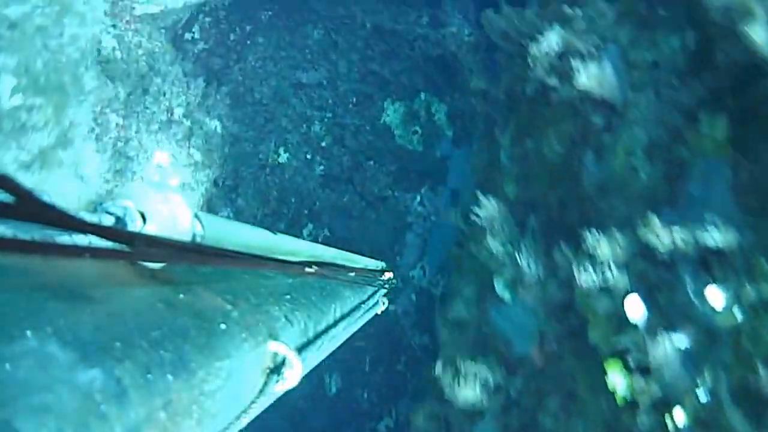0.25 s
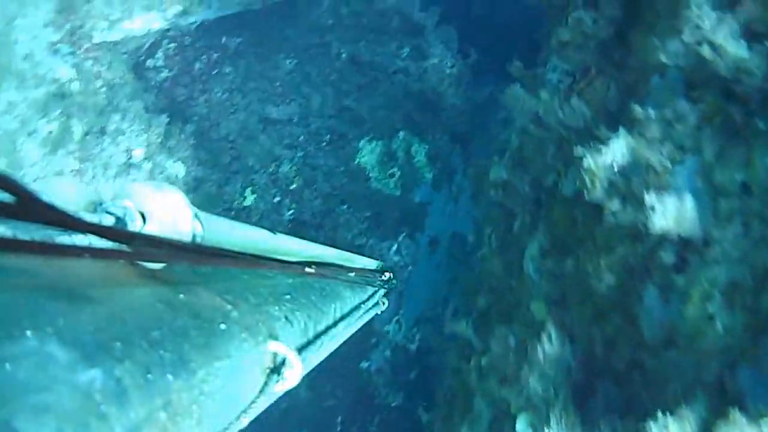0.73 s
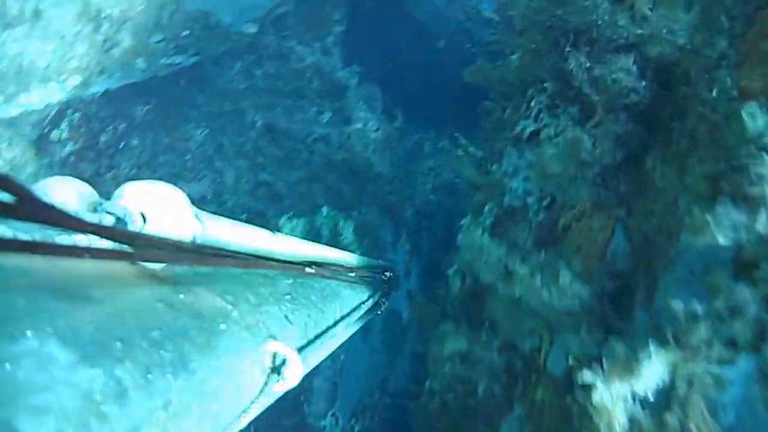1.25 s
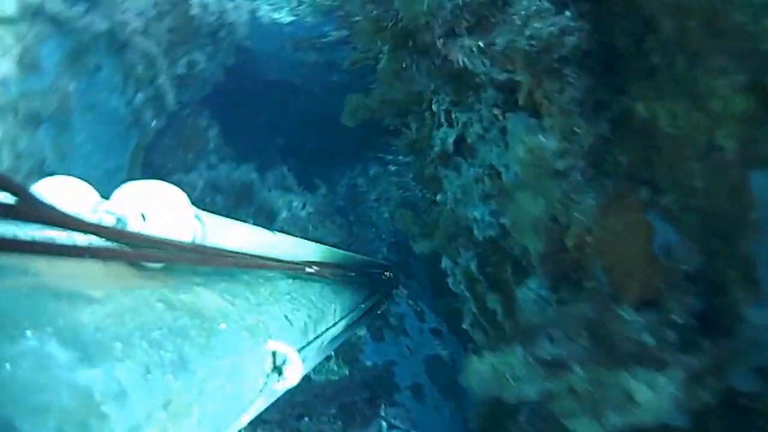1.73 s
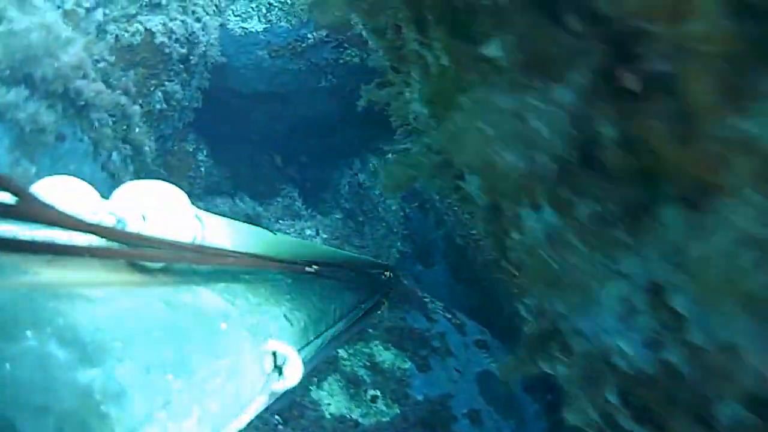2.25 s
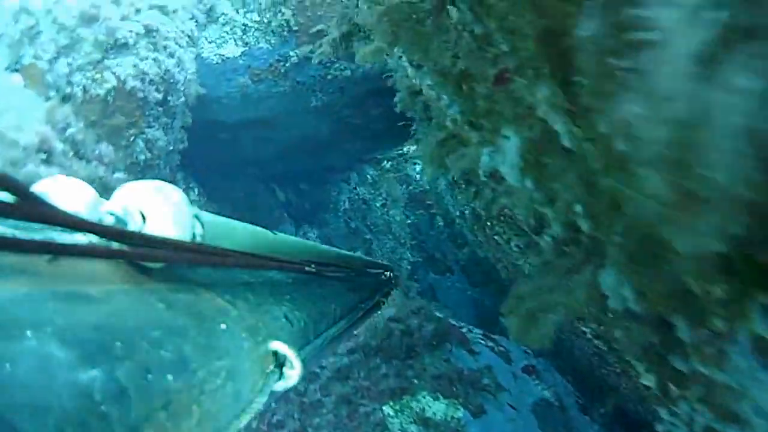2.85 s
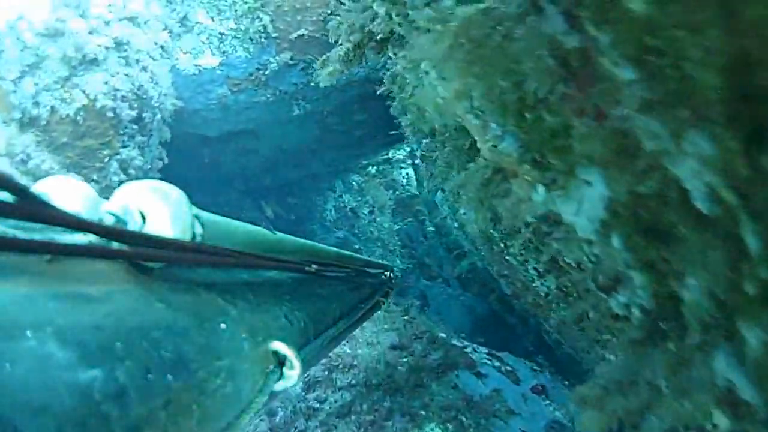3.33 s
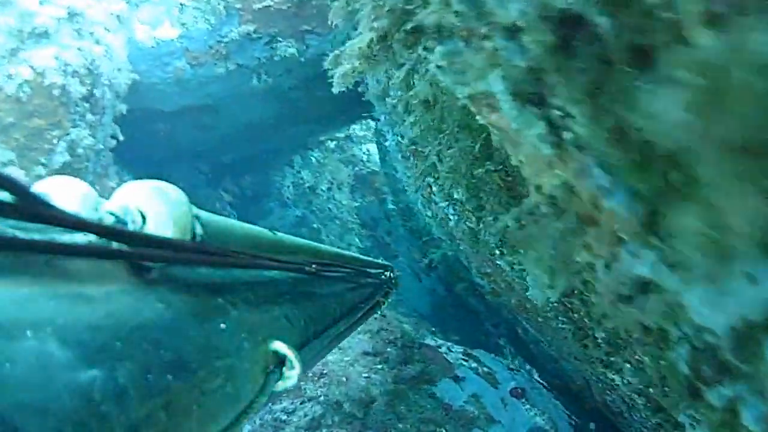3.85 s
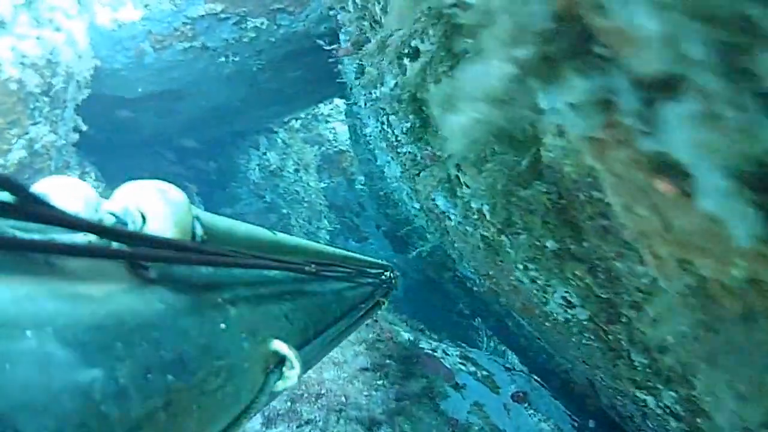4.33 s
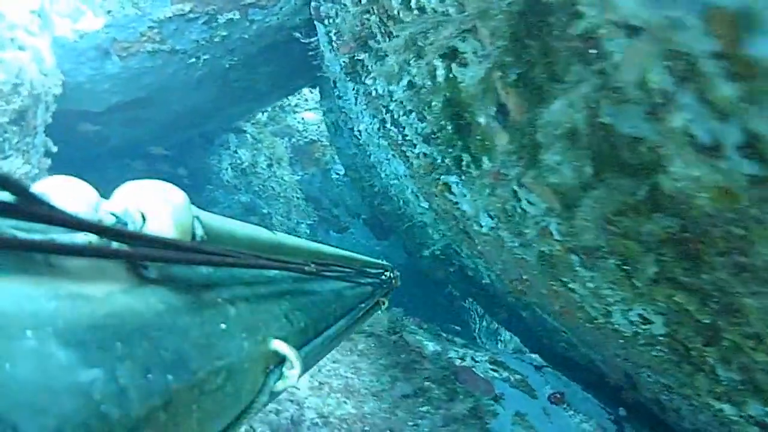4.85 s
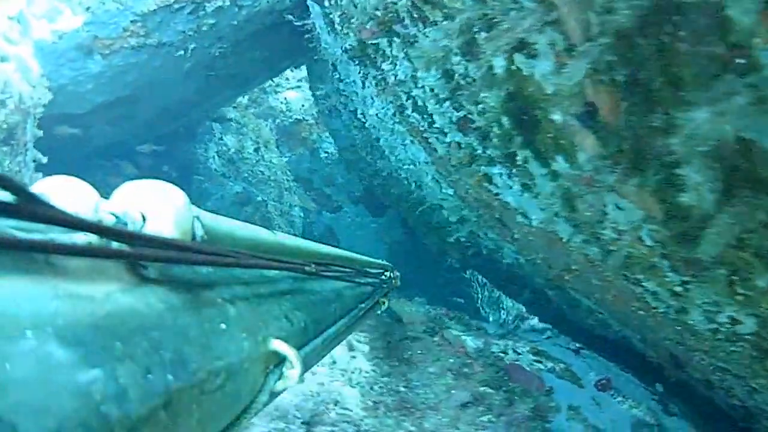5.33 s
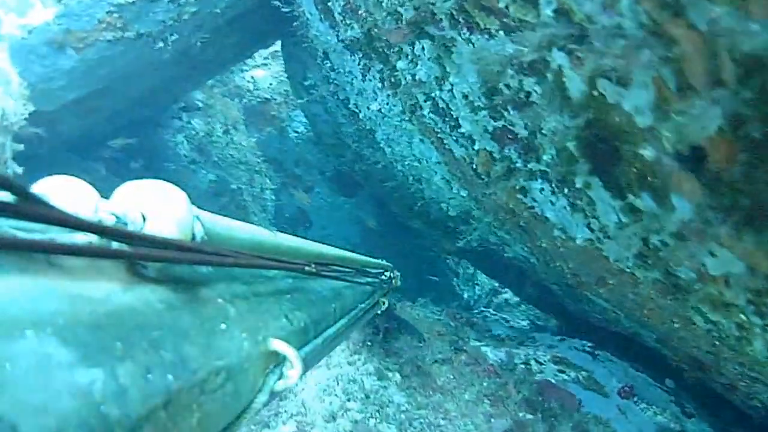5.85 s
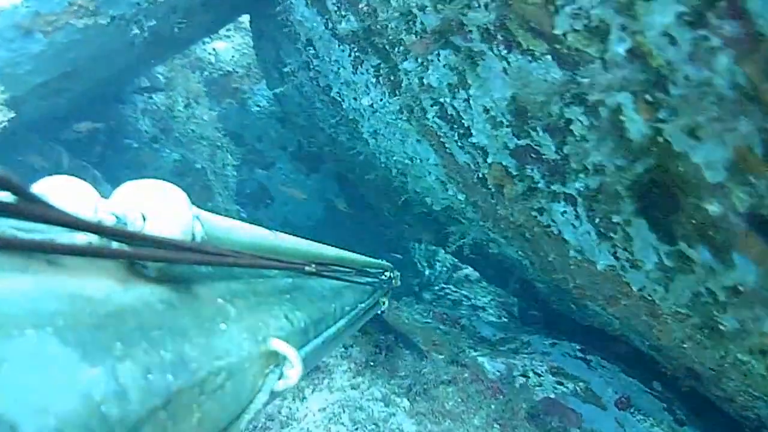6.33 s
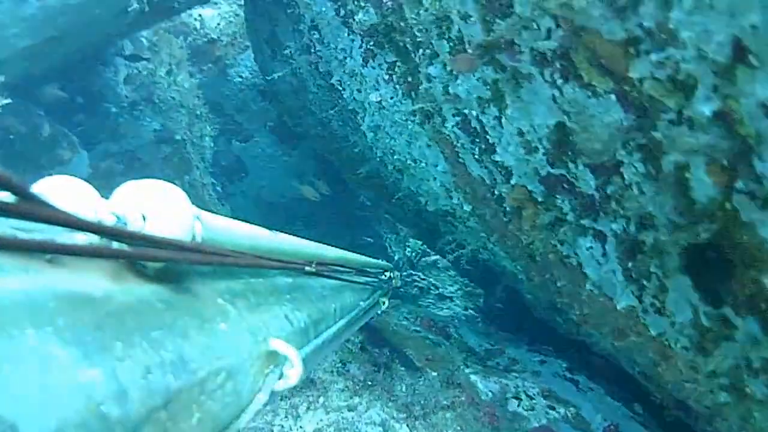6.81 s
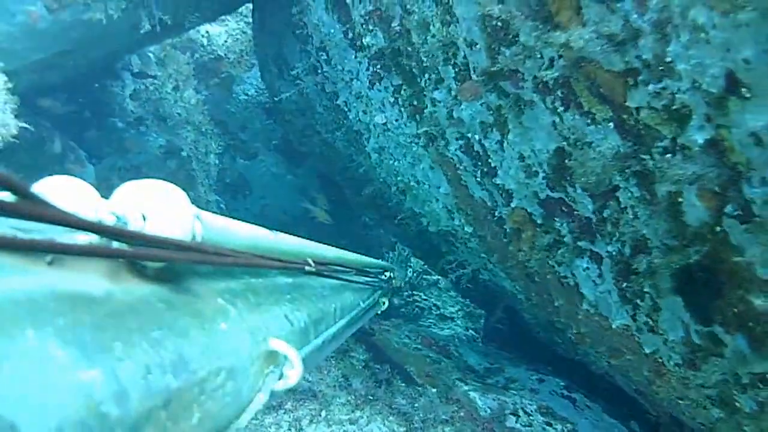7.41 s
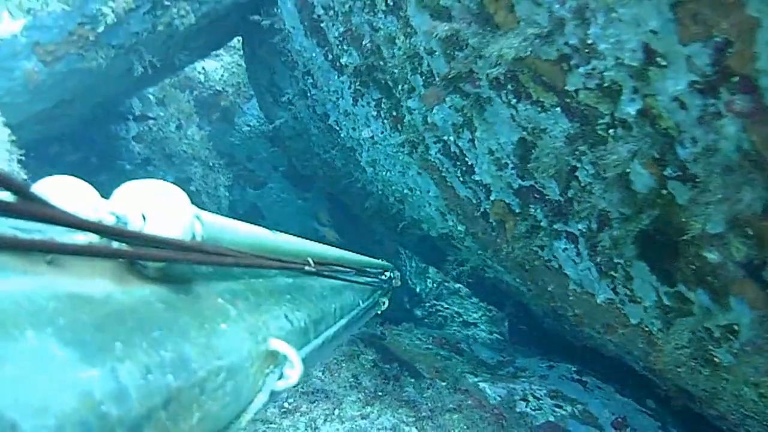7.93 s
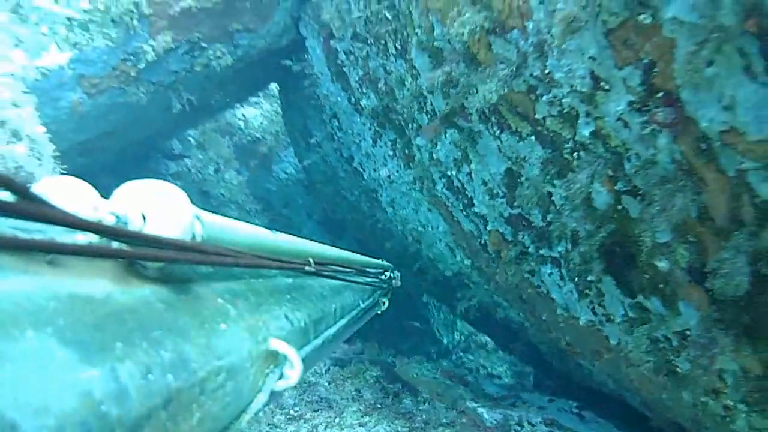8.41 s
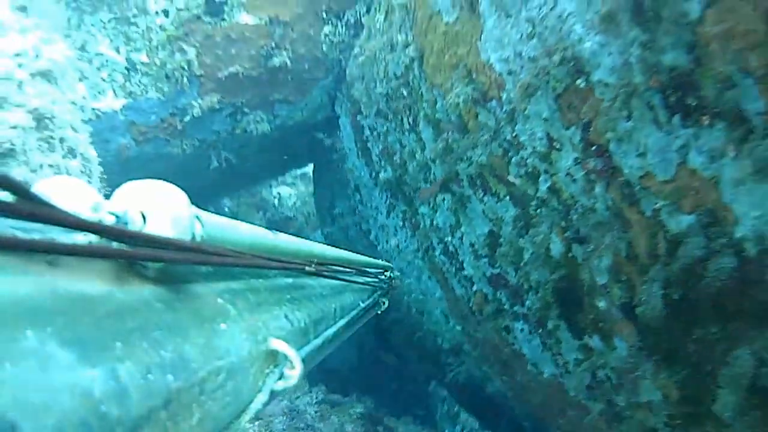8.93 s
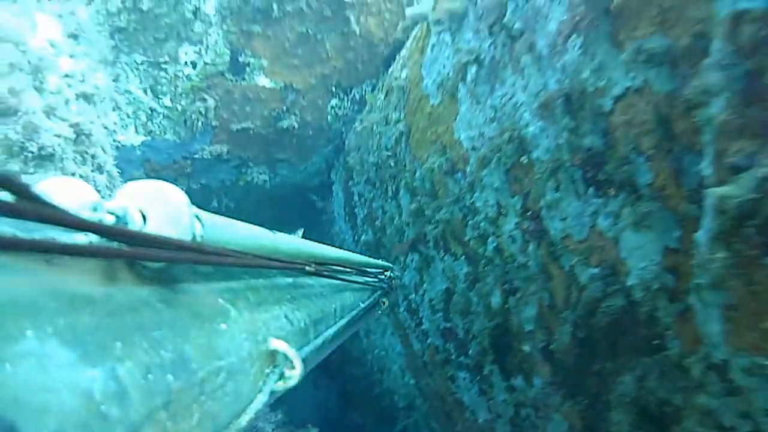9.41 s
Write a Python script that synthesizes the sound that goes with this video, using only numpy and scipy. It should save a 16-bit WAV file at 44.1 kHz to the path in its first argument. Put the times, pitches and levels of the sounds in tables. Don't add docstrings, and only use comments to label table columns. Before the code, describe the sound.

Close, muffled sound from inside a sealed underwater housing fixed to a long barrel. Deep flow rumble shakes the mount while water washes softly past. Early on come hollow knocks, rubbing and bubbly gurgles, with a distorted hard knock around two and a half seconds. Then a second open microphone adds faint hiss, thin whine, dry clicks and strap rustle as the rumble gradually eases and small taps continue.

```python
import sys
import numpy as np
from scipy import signal
from scipy.fft import rfft, irfft, next_fast_len
from scipy.io import wavfile
from scipy.ndimage import uniform_filter1d

SR = 44100
rng = np.random.default_rng(int(sys.argv[2]) if len(sys.argv) > 2 else 0)


def materialize(psi):
    bounded = np.clip(np.atleast_2d(psi).T, -1, 1)
    quanta = np.round(bounded * 32767).astype(np.int16)
    wavfile.write(sys.argv[1], SR, quanta)


def level_to_linear(level):
    exponent = np.asarray(level, float) / 20
    return 10 ** exponent


N = 426447


def rms_one(x):
    return x / np.sqrt(np.mean(x ** 2) + 1e-20)


def in_time(rows):
    s, *columns = np.transpose(rows)
    return [np.interp(np.arange(N) / SR, s, c) for c in columns]


def coloured(x, spectrum):
    size = next_fast_len(N)
    hz, db = np.transpose(spectrum)
    bin_hz = np.fft.rfftfreq(size, 1 / SR) + 1e-3
    shape_db = np.interp(np.log(bin_hz), np.log(hz), db, left=-120, right=-120)
    return rms_one(irfft(rfft(x, size) * level_to_linear(shape_db), size)[:N])


def drift(rate_hz):
    r = np.exp(-80 * np.pi * rate_hz / SR)
    white = rng.standard_normal(N // 40 + 2002)
    slow = signal.lfilter([1], [1, -2 * r, r * r], white)[2000:]
    return np.interp(np.arange(N) / 40, np.arange(len(slow)), rms_one(slow))


def evened(x, span_s):
    size = int(span_s * SR)
    power = uniform_filter1d(uniform_filter1d(x ** 2, size), size)
    return rms_one(x / np.sqrt(power + 0.23))


def swell(start_s, hold_s, db, rise_s, fall_s):
    t = np.arange(N) / SR - start_s
    rise_db = 20 * np.minimum(t / max(rise_s, .001), 0)
    fall_db = 20 * np.maximum(t - hold_s, 0) / max(fall_s, .001)
    return level_to_linear(db + rise_db - fall_db)


def ring(clicks, hz, t60_s):
    r = level_to_linear(-60 / (t60_s * SR))
    w = 2 * np.pi * hz / SR
    return signal.lfilter([0, np.sin(w)], [1, -2 * r * np.cos(w), r * r], clicks + 1e-18)


def add(out, s, hz, t60_s, rise_s, db):
    i = round(s * SR)
    t = np.arange(min(int(t60_s * SR) + 1, N - i)) / SR
    envelope = level_to_linear(db - 60 * t / t60_s) * (1 - np.exp(-t / rise_s))
    out[i:i + len(t)] += envelope * np.sin(2 * np.pi * hz * t)


# (frequency [Hz], density [dB per Hz])
FAINT_FLOOR_SPECTRUM = [(3500, -21), (4000, 11.5), (5000, -12), (9000, -3), (16000, -3), (17000, -45)]
FAINT_FLOOR_DB = -91.5
# (frequency [Hz], rms level [dB])
CLOCK_LINES = [(7801, -90), (11700, -95), (15600, -96)]
# (time [s], frequency [Hz], t60 [s], level [dB])
PINGS = [
    (2.4712, 7400, .006, -37),
    (2.471, 9500, 0.0053, -43),
    (2.4715, 5300, 0.0054, -44),
    (2.4745, 8050, .008, -51),
    (2.4745, 6000, .006, -52),
    (2.48, 6400, 0.014, -49),
    (2.48, 8400, .01, -55),
    (1.203, 6500, .003, -55),
    (1.212, 7500, .004, -64),
]


def faint_highs(shell):
    t = np.arange(N) / SR
    rumble = rms_one(shell)
    out = sum(level_to_linear(db + 1.5) * rumble * np.sin(2 * np.pi * hz * t) for hz, db in CLOCK_LINES)
    for s, hz, t60_s, db in PINGS:
        add(out, s, hz, t60_s, .0004, db)
    patchy = rng.standard_normal(N) * (0.3 + np.abs(rumble))
    return out + level_to_linear(FAINT_FLOOR_DB) * coloured(patchy, FAINT_FLOOR_SPECTRUM)


OPENS_S, HISS_DB = 3.385, -61
OFFSETS = [.0925, .0803]
# (frequency [Hz], density [dB per Hz])
HISS_SPECTRUM = [(60, -14), (200, 13.5), (1000, 9.5), (3000, 0.5), (4500, -0.5), (8000, -3), (11500, -4.5),
                 (15000, -4), (16000, -8), (17000, -36.5)]
# (frequency [Hz], rms level [dB])
WHINE_LINES = [(3899, -73.5), (14999, -77), (15099, -88)]
# (frequency [Hz], density [dB per Hz])
RUSTLE_SPECTRUM = [(880, -40), (1500, -3), (1870, -6.5), (1980, -13), (2690, -5), (2940, -17), (3730, -3.5),
                   (8240, -7), (9850, -16.5), (14800, -18), (16000, -23)]
# (peak time [s], level [dB], rise [s per 20 dB], fall [s per 20 dB])
RUSTLE_STROKES = [(3.5, -65.5, .12, .14), (3.9, -61.5, 0.13, .15), (4.66, -65.5, .03, 0.074),
                  (4.84, -67.5, .3, 0.27), (7.174, -46, .005, .06), (7.225, -54.5, 0.074, .08),
                  (7.335, -45, 0.056, 0.017), (7.35, -61, 0.018, 0.083), (7.41, -59, .012, 0.052),
                  (7.77, -60.5, 0.06, .03), (7.83, -57.5, .06, .05), (8.374, -58, 0.073, .022),
                  (8.7, -63.5, .05, .06), (4.71, -65.5, .05, .06), (4.95, -65.5, .05, .08)]
# (time [s], peak level [dB], centre [Hz], relative top level [dB])
DRY_CLICKS = [(3.8931, -25.5, 6230, -17), (3.8977, -27, 14800, -20.5), (3.898, -37, 8560, -3.5),
              (3.9425, -38, 9040, -3), (4.6579, -22.5, 4780, -23.5), (4.84, -34, 6800, -10.5),
              (4.907, -42.5, 4950, -18), (5.0233, -48, 5500, -20), (7.1707, -30, 5840, -20),
              (7.1725, -18.5, 6800, -16), (7.1747, -31, 4200, -6), (7.19, -26, 6730, -38),
              (7.3096, -38.5, 6000, -19.5), (7.3375, -25, 6450, -17), (7.7805, -50.5, 4150, -17.5),
              (7.8234, -45, 5000, -20), (7.9961, -48, 5000, -21), (8.0546, -42, 4400, -16),
              (8.374, -51, 4030, -12), (8.6946, -45, 5250, -23)]


def open_microphone():
    t = np.arange(N) / SR
    white = rng.standard_normal((3, N))
    waver_rad = 0.7 * drift(3.0)
    mid = level_to_linear(HISS_DB) * coloured(white[0], HISS_SPECTRUM)
    for hz, db in WHINE_LINES:
        mid += np.sqrt(2) * level_to_linear(db) * np.sin(2 * np.pi * hz * t + waver_rad)
    strokes = sum(swell(s, 0, db, rise_s, fall_s) for s, db, rise_s, fall_s in RUSTLE_STROKES)
    grains = white[1] * level_to_linear(2.8 * drift(200.0))
    mid += strokes * coloured(grains, RUSTLE_SPECTRUM)
    for s, db, hz, top_db in DRY_CLICKS:
        add(mid, s, hz, .004, .0002, db + 0.5)
        add(mid, s + 0.0017, hz * 1.5, .004, .0002, db - 13.5)
        add(mid, s, min(hz * 1.27, 15500), .004, .0002, db - 8.5)
        add(mid, s, hz * .72, .004, .0002, db - 9.5)
        add(mid, s, hz * .86, .003, .0002, db - 5.5)
        add(mid, s, min(hz * 1.13, 15600), .003, .0002, db - 5.5)
        add(mid, s, hz * 0.63, .004, .0002, db - 18.0)
        add(mid, s, 2400.0, .005, .0002, db - 11.0)
        add(mid, s, 11500.0, .004, .0001, db + top_db)
        add(mid, s, 14200.0, .004, .0001, db + top_db - 0.5)
    side = level_to_linear(HISS_DB - 11) * coloured(white[2], HISS_SPECTRUM)
    stereo = mid * level_to_linear(np.array([[.3], [-.3]])) + side * [[1], [-1]]
    settle = np.sin(np.pi / 2 * np.clip((t - OPENS_S) / .045, 0, 1)) ** 2
    return stereo * (t > OPENS_S) + np.c_[OFFSETS] * settle


SLOWING_DB_PER_S, EFFORT_LIFTS = 0.41, 0.071
# (time [s], level [dB])
EFFORT = [(0, -22.5), (.28, -27.5), (.4, -17.5), (.65, -20.5), (1.05, -15), (1.6, -18.5), (2.8, -20.5),
          (3.5, -22.5), (3.65, -31.5), (3.94, -17.5), (4.08, -26), (5.3, -28), (7.4, -28.5), (7.65, -32),
          (8.4, -32), (8.57, -26.5), (8.72, -37.5), (9.67, -29.5)]


def speed_db():
    effort_db, = in_time(EFFORT)
    return -SLOWING_DB_PER_S * np.arange(N) / SR + EFFORT_LIFTS * (effort_db - effort_db.mean())


WASH_DB, RUB_DB, CALM_DB = -45, -39.5, -24
RUB_FOLLOWS, CALM_FOLLOWS = 1.45, 3
# (frequency [Hz], density [dB per Hz])
SWAY_SPECTRUM = [(3, -29.5), (5.5, -13), (9.4, -7), (13.5, 2.5), (17.5, -6.5), (22, -13), (30, -20),
                 (40, -35.5)]
SHAKE_SPECTRUM = [(22, -28.5), (30, -6), (37, -8), (45, -5.5), (53, 2), (58, -6), (63, -13), (70, -22),
                  (90, -28), (120, -55)]
RUB_SPECTRUM = [(41, -29.5), (70, -7.5), (84, -4.5), (102, -7), (113, -8), (359, -18), (488, -39.5),
                (553, -41.5), (600, -45.5), (780, -63.5), (1320, -120)]
WASH_SPECTRUM = [(210, -41), (350, -14), (489, -6), (617, -12), (1200, -16), (1800, -15.5), (2290, -19),
                 (3030, -17.5), (3500, -17), (3740, -16.5), (3960, -64.5), (4470, -24.5), (5000, -54.5),
                 (6500, -99), (11000, -120)]
# (time [s], peak level [dB], half length [s])
SURGES = [(.15, -16.5, 0.23), (0.53, -6.5, 0.21), (0.979, -16, 0.3), (1.523, -4.5, 0.2),
          (1.98, -13.5, 0.22), (2.186, -7, 0.25), (2.684, -6.5, 0.14), (2.98, -17, 0.26),
          (3.527, -9.5, 0.16), (3.948, -19.5, 0.27), (4.266, -15, 0.43), (4.546, -18.5, 0.17),
          (4.96, -18, 0.3), (5.672, -21, 0.15), (5.9, -26, 0.22), (6.147, -18, 0.12), (6.395, -15, 0.11),
          (6.678, -16.5, 0.078), (7.084, -16, 0.14), (7.414, -15.5, 0.13), (8.257, -27, 0.28),
          (8.97, -22, 0.25), (9.613, -14.5, 0.35)]


def flow():
    t, speed = np.arange(N) / SR, speed_db()
    surging = level_to_linear(CALM_DB + CALM_FOLLOWS * speed)
    for s, db, half_s in SURGES:
        surging += level_to_linear(db - 2.5) * np.exp(-2.6 * ((t - s) / half_s) ** 2)
    effort_db, = in_time(EFFORT)
    white = rng.standard_normal((4, N))
    lumps = drift(7.6)
    rub = white[2] * level_to_linear(2.7 * lumps)
    wash = white[3] * level_to_linear(0.47 * lumps + 1.2 * drift(40.0))
    out = surging * evened(coloured(white[0], SWAY_SPECTRUM), span_s=0.45)
    out += level_to_linear(effort_db + 1.5) * evened(coloured(white[1], SHAKE_SPECTRUM), span_s=0.25)
    out += level_to_linear(RUB_DB + RUB_FOLLOWS * speed) * coloured(rub, RUB_SPECTRUM)
    return out + level_to_linear(WASH_DB + speed) * coloured(wash, WASH_SPECTRUM)


# (frequency [Hz], rms level [dB], t60 [s], rate [impacts per s])
SHELL_MODES = [(490, -54.5, 0.18, 120), (423, -57.5, 0.062, 65), (1780, -59.5, 0.028, 260),
               (1670, -68.5, .02, 100), (2940, -64.5, .012, 45)]


def ticking():
    out, busy = 0, level_to_linear(3.0 * drift(2.4))
    for hz, db, t60_s, per_s in SHELL_MODES:
        impacts = (rng.random(N) < per_s * busy / SR) * rng.choice([-1, 1], N)
        strength = level_to_linear(4.7 * np.minimum(rng.exponential(1, N), 4))
        out = out + level_to_linear(db) * rms_one(ring(impacts * strength, hz, t60_s))
    return out


# (time [s], peak level [dB], frequency [Hz])
GURGLES = [(.446, -42, 238), (.488, -28, 235), (.518, -25, 270), (.53, -27, 225), (.606, -30, 250),
           (0.629, -28, 235), (.635, -31.5, 310), (.701, -23.5, 245), (0.761, -29, 250), (.788, -27, 215),
           (.795, -33, 290), (.82, -31.5, 245), (1.47, -33, 235), (1.493, -35, 235), (1.6, -28, 250),
           (1.655, -28, 215), (1.761, -37, 225), (1.789, -39, 240)]
# (time [s], peak level [dB], frequency [Hz], t60 [s])
THUDS = [
    (1.0872, -10.5, 81.7, 0.053),
    (1.2041, -4, 85.5, .045),
    (1.2042, -16.5, 253.6, 0.092),
    (1.573, -22, 141, .05),
    (9.48, -25, 106.4, 0.076),
    (9.482, -30.5, 171, 0.085),
    (9.484, -32.5, 244, 0.058),
]


def gurgles():
    out = np.zeros(N)
    for s, db, hz in GURGLES:
        add(out, s, hz, .1, .006, db + 6.5)
    for s, db, hz, t60_s in THUDS:
        add(out, s, hz, t60_s, .003, db + 12.0)
    return out


# (time [s], peak level [dB], frequency [Hz])
LIGHT_TAPS = [(0.286, -31.5, 510), (0.615, -29, 482), (0.683, -29, 485), (0.759, -38.5, 510),
              (0.872, -34.5, 514), (0.905, -33, 495), (1.129, -30.5, 496), (1.585, -40.5, 480),
              (3.114, -34.5, 400), (4.125, -40, 493), (4.587, -39.5, 405), (4.791, -33.5, 432),
              (4.849, -33.5, 407), (5.002, -34, 492), (5.093, -37, 490), (5.329, -39, 452),
              (5.638, -32.5, 473), (5.983, -39, 385), (5.999, -34, 491), (6.238, -36, 420),
              (6.291, -34, 510), (6.377, -31, 495), (6.454, -35, 494), (6.674, -39, 460),
              (7.136, -34.5, 501), (7.511, -35.5, 484), (7.582, -30.5, 392), (8.059, -36, 506),
              (8.113, -42, 510)]
# (time [s], peak level [dB], frequency [Hz])
LIGHT_TICKS = [(0.613, -41, 1760), (1.4475, -36.5, 1620), (2.6878, -36.5, 1810), (2.8185, -45, 1860),
               (2.9647, -42, 1660), (3.1382, -40, 1810), (3.1764, -45.5, 1800), (4.195, -43.5, 1650),
               (4.3824, -39, 1760), (5.0948, -47, 1610), (5.109, -40, 1750), (5.1267, -44, 1670),
               (5.3303, -43, 1760), (5.3996, -40, 1700), (5.591, -44, 1810), (5.8915, -44, 1610),
               (5.9075, -42, 1970), (6.2864, -47, 1800), (6.422, -40, 1680), (6.4742, -42, 1880),
               (6.5001, -50, 1710), (7.6694, -55, 1760), (7.7672, -42, 1770), (7.7894, -47, 1730),
               (7.877, -31, 1830), (7.8984, -42, 1840), (8.275, -43, 1780), (8.4127, -40, 1760),
               (8.6477, -42, 1850), (8.7999, -48, 1930)]
# (time [s], peak level [dB], frequency [Hz])
LIGHT_SNAPS = [(0.6314, -44, 2670), (0.7567, -48, 2680), (0.8969, -49, 2560), (1.8148, -46, 2680),
               (2.142, -43, 2710), (2.9013, -47, 2500), (3.1078, -48, 2830), (3.14, -41, 2960),
               (4.343, -46, 2580), (5.094, -41, 2900), (5.744, -41, 3040), (6.6348, -48, 2580),
               (6.7044, -56, 2530), (7.0469, -46, 2940), (7.8111, -53, 2550), (7.8226, -47, 2540),
               (7.876, -40, 2750), (7.8974, -41, 2990), (7.9189, -46, 3020), (9.026, -49, 2540)]


def light_taps():
    out = np.zeros(N)
    for s, db, hz in LIGHT_TAPS:
        add(out, s, hz, .07, .003, db + 2.5)
        add(out, s + .004, hz * .88, .04, .003, db - 1.0)
    for s, db, hz in LIGHT_TICKS:
        add(out, s, hz, .024, .001, db + 6.0)
        add(out, s, hz * 1.12, .012, .001, db - 2.0)
    for s, db, hz in LIGHT_SNAPS:
        add(out, s, hz, .016, .0005, db + 9.5)
        add(out, s, hz, .009, .0004, db + 0.5)
        add(out, s, hz * 0.77, .009, .0004, db + 4.5)
    return out


# (time [s], peak level [dB], frequency [Hz], t60 [s])
TAPS = [(0.235, -24.5, 490, 0.045), (0.346, -19, 347, 0.07), (0.497, -24, 466.5, 0.12),
        (0.512, -23, 490, 0.12), (0.942, -29, 493, 0.079), (1.704, -23.5, 263, 0.081),
        (2.133, -17.5, 271.5, 0.1), (2.104, -28, 485, 0.084), (2.356, -21, 480, 0.053),
        (2.475, -17, 501, 0.088), (3.268, -28.5, 487, 0.13), (3.353, -33, 481.5, 0.12),
        (3.874, -35, 490, 0.067), (3.966, -32.5, 428, 0.086), (4.421, -35.5, 499, 0.068),
        (5.28, -30, 396, 0.052), (5.399, -37.5, 480, 0.071), (5.548, -24.5, 480, 0.025),
        (5.697, -36.5, 483, 0.15), (5.963, -34, 443, 0.058), (6.347, -30, 372, 0.073),
        (6.355, -32.5, 545, 0.081), (6.419, -25, 473, 0.067), (6.778, -25.5, 472, 0.065),
        (7.369, -26, 495, 0.063), (7.564, -38.5, 390, 0.076), (7.689, -33.5, 482, 0.049),
        (7.981, -31, 465, 0.047), (8.262, -27, 482, 0.088), (8.348, -29, 503, 0.055),
        (9.281, -33, 334, 0.034)]
# (time [s], peak level [dB], frequency [Hz], relative lower crack [dB])
TICKS = [(0.3436, -35, 1510, -10.5), (0.4783, -34.5, 1810, -12.5), (0.802, -38.5, 1550, -15),
         (0.9426, -40, 1440, -5), (1.093, -28, 1540, 0.5), (1.2023, -23.5, 1470, -9),
         (1.503, -38, 1810, -9), (1.9137, -31.5, 1780, -24), (1.995, -32.5, 1770, -14),
         (2.0374, -37, 1810, -5), (2.114, -38, 1680, -9.5), (2.144, -33, 1800, -24),
         (2.314, -28, 1735, -25), (2.356, -35.5, 1800, -6), (2.47, -36, 1555, -11),
         (2.9035, -42, 1800, -13), (2.9896, -35.5, 1860, -6), (3.109, -35, 1850, -29.5),
         (4.04, -32, 1830, -16), (4.643, -30.5, 1800, -13), (5.055, -36.5, 1740, -11),
         (5.245, -32, 2010, 7), (5.438, -37.5, 1700, -10), (5.55, -33, 1770, -17), (6.357, -42, 1790, -7),
         (7.0474, -35.5, 1840, -17), (7.865, -33, 1730, -17), (8.398, -36, 1840, -15),
         (8.989, -43, 1550, 9), (9.279, -33, 1780, -4)]
# (time [s], peak level [dB], frequency [Hz])
SNAPS = [(0.6111, -34.5, 2730), (0.7993, -34, 2660), (1.0927, -32, 3200), (1.2004, -35.5, 2720),
         (1.512, -28, 3100), (1.913, -27.5, 3160), (2.0353, -37, 2900), (2.11, -36, 2710),
         (2.3127, -45, 2940), (2.3553, -43, 2620), (2.47, -38, 2780), (2.6868, -35, 2670),
         (2.964, -43, 2900), (3.1772, -35.5, 2720), (4.1945, -34.5, 2700), (4.383, -36, 2620),
         (4.6424, -47, 2600), (4.6589, -42, 2800), (5.2463, -32.5, 2640), (5.549, -46, 2250),
         (5.891, -37, 2600), (6.5, -34, 2950), (7.168, -45, 3000), (7.333, -33, 2550), (7.866, -34, 3000),
         (8.1155, -42, 2900), (8.3972, -37, 2620), (9.2789, -35.5, 2920)]


def taps():
    out = np.zeros(N)
    for s, db, hz, t60_s in TAPS:
        add(out, s, hz, max(t60_s, .02), .003, db + 7.0)
        add(out, s, hz * 1.17, .04, .002, db - 6.5)
        add(out, s + 0.007, hz * .86, .045, .003, db - 8.0)
    for s, db, hz, lower_db in TICKS:
        add(out, s, hz, .026, .001, db + 4.5)
        add(out, s, hz * 1.1, .015, .001, db + 2.5)
        for crack_hz in [850, 1100, 1350]:
            add(out, s, crack_hz, .012, .0006, db + lower_db - 9.0)
    luck = rng.standard_normal((len(SNAPS), 7))
    for (s, db, hz), row in zip(SNAPS, luck):
        add(out, s, hz, .016, .0005, db + 2.0)
        for k, crack_hz in enumerate(np.geomspace(1700, 3800, num=7)):
            add(out, s + 0.00036 * k, crack_hz, .01, .0003, db - 5.0 + 1.8 * k + 1.5 * row[k])
    return out


# (frequency [Hz], level [dB], t60 [s])
BARREL_MODES = [(121.6, -1, 0.19), (147, 0, 0.27), (208.4, 1, 0.2), (238.7, 3.5, 0.2), (317, -11, 0.26),
                (450, -6.5, 0.16), (172, -2, 0.11), (273, -7, 0.077), (385.7, -13, 0.082)]
# (start [s], length [s], level [dB])
CHAFES = [
    (0.5, 0.28, -37),
    (.97, .1, -47.5),
    (1.5, 0.3, -38.5),
    (2.043, 0.17, -35.5),
    (2.551, 0.035, -34.5),
]


def chafe():
    grit = rng.standard_normal(N) * level_to_linear(2 * drift(18))
    rung = sum(level_to_linear(2.0 * db) * ring(grit, hz, 0.52 * t60_s) for hz, db, t60_s in BARREL_MODES)
    strokes = sum(swell(s, hold_s, db, rise_s=0.37, fall_s=0.18) for s, hold_s, db in CHAFES)
    return strokes * evened(rung, span_s=0.059)


SOFT_RING, RING_PER_DB = .44, .009
HARD_CRACK_DB, SLAM_ABOVE_DB = -30, -12
# (time [s], peak level [dB], then relative low modes, upper modes, crack [dB])
KNOCKS = [(.344, -8, -1.5, 2.5, -28), (1.085, -21.5, 1, -6, -19), (1.093, -22, 0, -7, -15.5),
          (1.202, -4.5, -9, -13.5, -31), (1.58, -33.5, 7, -11, -26.5), (1.706, -35, -7, -4, -16),
          (1.944, -20.5, 7, -4, -22.5), (1.972, -16, -5, -5.5, -28.5), (2.133, -28.5, -9.5, -10, -14.5),
          (2.457, -17.5, -12, 0, -36), (2.470, 0, -12.5, 3.5, -4), (2.687, -36, 2.5, 1.5, -11),
          (3.965, -28, 1.5, 1, -21), (4.08, -32.5, -23, 3.5, -10.5), (5.395, -32.5, 2, 0, -22),
          (7.336, -34, 3.5, -5, -7.5), (7.821, -36, 3, -13, -20), (8.9897, -52.5, 10, 3, 9.5),
          (9.482, -32, 12, -16, -29)]
# (frequency [Hz], level [dB], t60 [s])
SLAM_MODES = [(121.5, -9, 0.23), (152, -8, .15), (171.6, -12, 0.1), (211.8, 0.5, .12), (239, 0.5, .13),
              (325.7, -2.5, .13), (371, -12, .1), (434, -7, .12), (490, -7.5, .09), (554, -16.5, 0.064),
              (640, -12.5, .05), (766, -10.5, .045), (882, -12, 0.0395), (226, -0.5, 0.041)]


def knocks():
    out = np.zeros(N)
    luck = rng.standard_normal((len(KNOCKS), 24))
    for (s, db, low_db, upper_db, crack_db), row in zip(KNOCKS, luck):
        slam = db + crack_db > SLAM_ABOVE_DB
        if slam:
            for hz, mode_db, t60_s in SLAM_MODES:
                add(out, s, hz, t60_s, .002, db + mode_db + 3.0)
        else:
            share = SOFT_RING + RING_PER_DB * max(db + crack_db - HARD_CRACK_DB, 0)
            for (hz, mode_db, t60_s), z in zip(BARREL_MODES, row):
                place_db = low_db if hz < 180 else upper_db if hz > 290 else 0
                level_db = db + place_db + 0.41 * mode_db - 0.7 + 3.4 * z
                add(out, s, hz, t60_s * np.clip(share, .1, 2), .0025, level_db)
        add(out, s, 110.0, .045, .003, db + low_db + 4.0)
        for hz, z in zip(np.geomspace(620, 3500, 12), row[12:]):
            if slam and hz < 1000:
                continue
            level_db = db + crack_db + 7.0 - 10.0 * np.log2(hz / 620) + 5.9 * z
            add(out, s, hz, 22.6 / hz, .0006, level_db)
    return out


HOUSING_CUT_HZ, LEFT_LAG_SAMPLES = 3900, 6
OVERLOAD_PEAK = .905


def scene():
    speed = speed_db()
    shell = flow() + chafe() + level_to_linear(1.5 * (speed - speed.mean())) * ticking()
    shell = shell - knocks() + gurgles() + taps() + light_taps()
    wall = signal.butter(9, HOUSING_CUT_HZ, fs=SR, output="sos")
    shell = signal.sosfilt(wall, shell, zi=signal.sosfilt_zi(wall) * shell[0])[0]
    shell = OVERLOAD_PEAK * shell / (1 + np.abs(shell / OVERLOAD_PEAK) ** 9) ** (1 / 9)
    smooth = signal.butter(4, 4600, fs=SR, output="sos")
    shell = .75 * signal.sosfiltfilt(smooth, shell) + .25 * shell
    late = np.r_[np.full(LEFT_LAG_SAMPLES, shell[0]), shell[:-LEFT_LAG_SAMPLES]]
    own_wash = [level_to_linear(-62.5) * coloured(w, WASH_SPECTRUM) for w in rng.standard_normal((2, N))]
    housing = np.array([late * level_to_linear(.15), shell * level_to_linear(-.15)]) + own_wash
    return housing + faint_highs(shell) + open_microphone()


def band_limit(x):
    return signal.sosfilt(signal.butter(12, 15830, fs=SR, output="sos"), x)


def record(dry):
    return band_limit(dry)


dry = scene()
out = record(dry)
materialize(out)
```